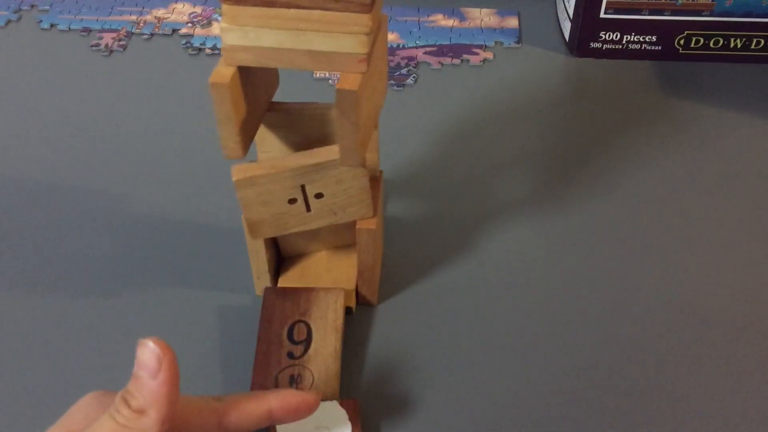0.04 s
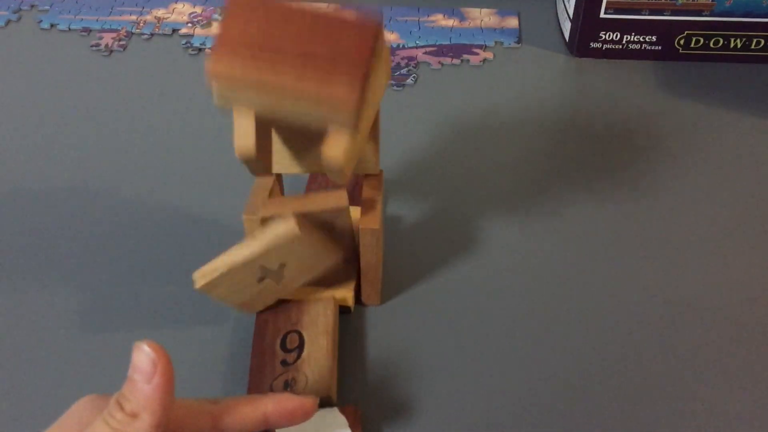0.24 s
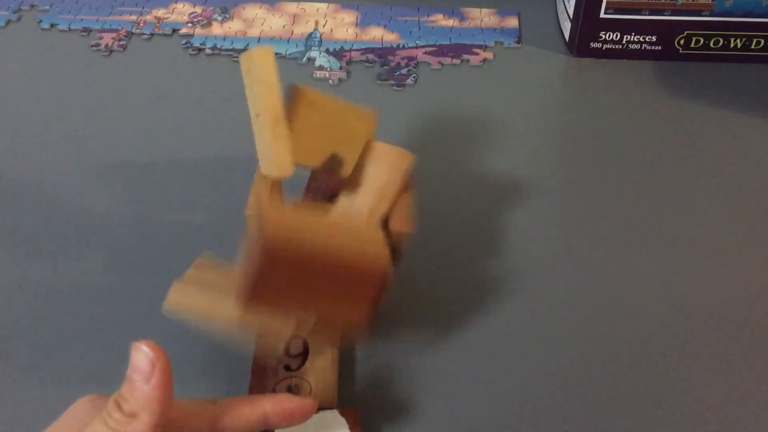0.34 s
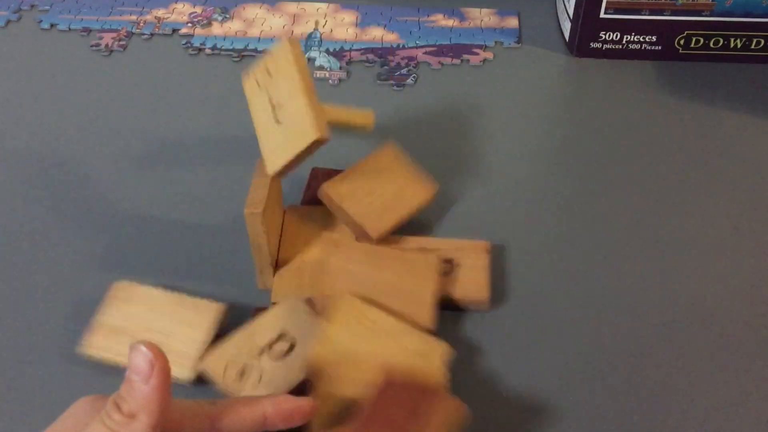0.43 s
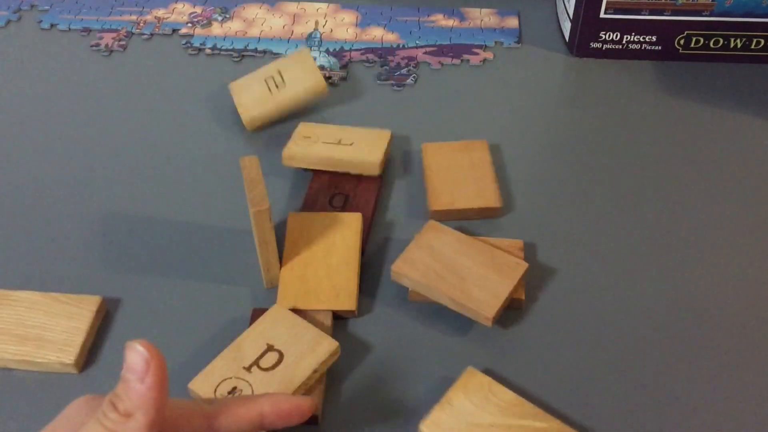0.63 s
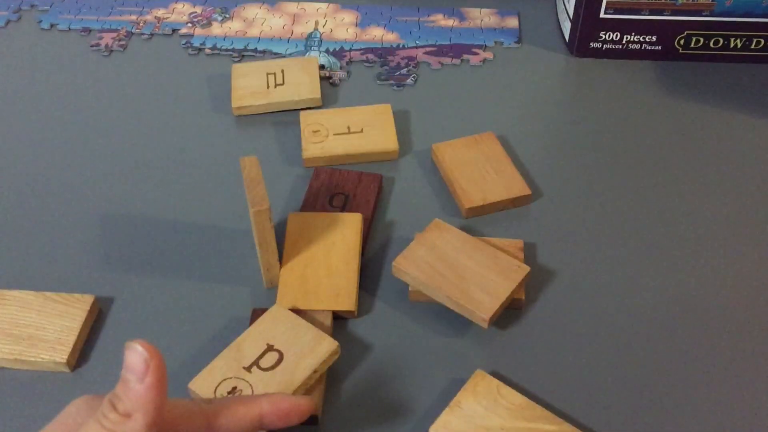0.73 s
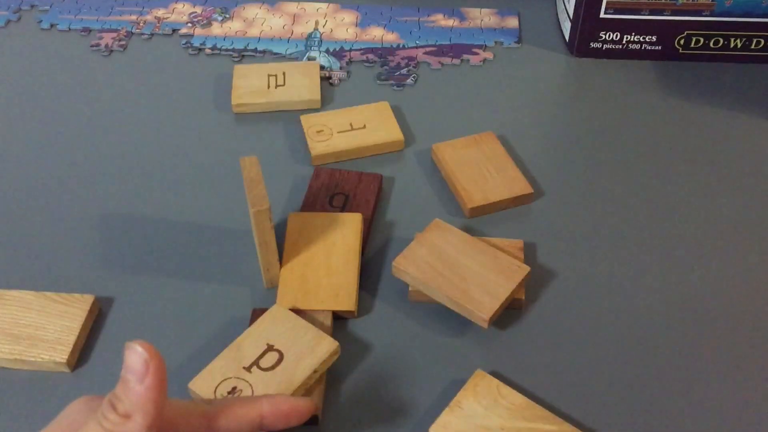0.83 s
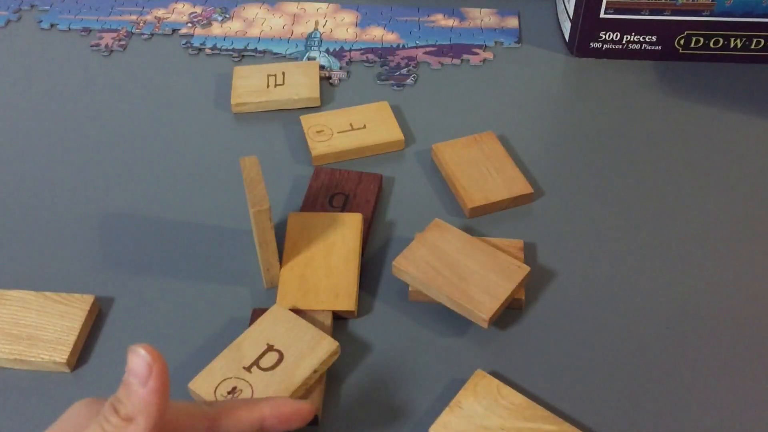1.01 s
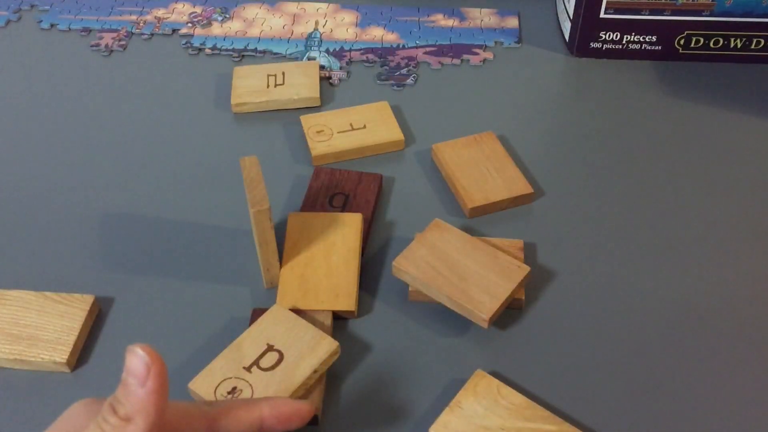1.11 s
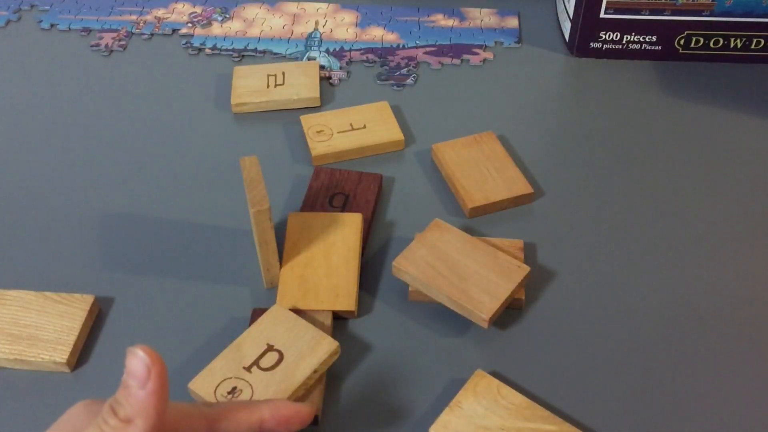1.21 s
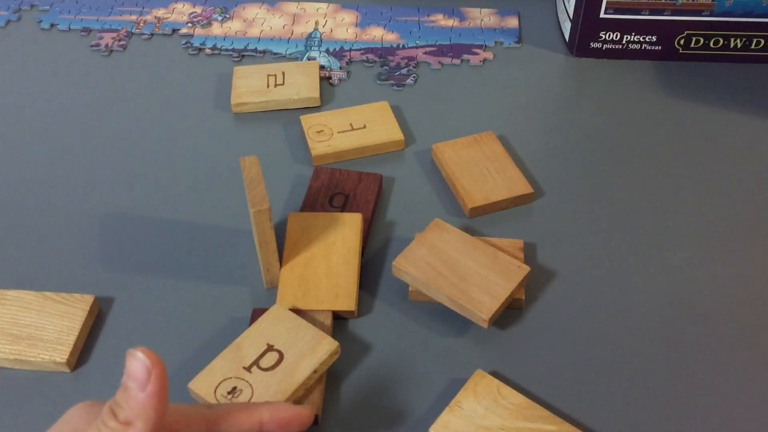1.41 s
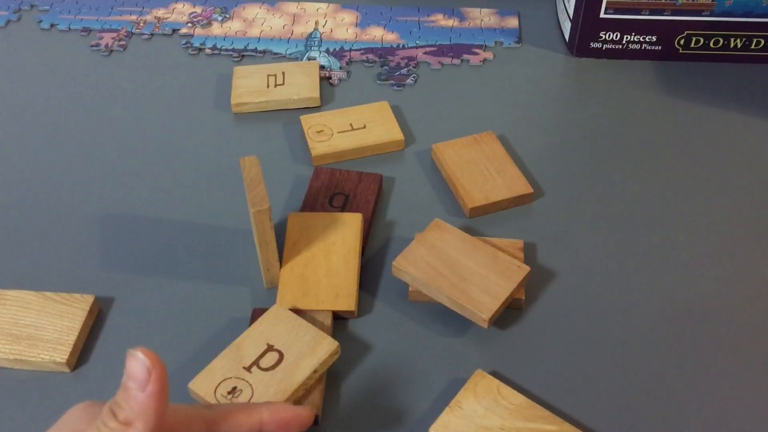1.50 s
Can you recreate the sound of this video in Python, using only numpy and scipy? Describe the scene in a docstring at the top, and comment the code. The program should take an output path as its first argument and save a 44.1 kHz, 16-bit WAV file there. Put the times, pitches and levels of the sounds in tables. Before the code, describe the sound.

A tower of wooden dominoes collapses on a table, close up in a small room. A tile scrapes faintly just before the first sharp knock at 0.2 seconds. Clacks, thuds and bounces build into a dense clatter, loudest and slightly overloaded from 0.4 to 0.7 seconds. The last light taps end around 1 second, and a faint, thin ring fades over low rumble and hiss.

```python
"""A tower of wooden dominoes collapses on a table in a small room, close up, overloading the input.
Each knock is a contact crack, the tile's modes and a table thud; small bounces fill the gaps.
A tile scrapes before the fall. A thin ring, as of glass or metal, swells with the clatter and dies.
Behind it: low rumble, hiss, faint hum and a fading echo at the start."""
import sys
import numpy as np
from scipy import signal
from scipy.fft import rfft, irfft
from scipy.io import wavfile
from scipy.ndimage import uniform_filter1d

SR = 44100
rng = np.random.default_rng(int(sys.argv[2]) if len(sys.argv) > 2 else 0)


def master_out(mix):
    """Clip the mix to full scale and print it as 16-bit PCM to the path in sys.argv[1]."""
    frames = np.transpose(np.atleast_2d(mix))
    ceiling = np.clip(frames, -1, 1)
    pcm = np.round(ceiling * 32767).astype(np.int16)
    wavfile.write(sys.argv[1], SR, pcm)


N = 68355
PIVOT_HZ = 3000  # spectral tilt is 0 dB here


def dominoes(spot_count, bounces_per_s=260):
    """Loud knocks and small random bounces, dealt out over spots on the table."""
    # tile impacts: (time [s], level [dB], pitch [ratio], tilt [dB/oct], favoured [Hz], thud [dB])
    knocks = [(0.2104, -1, 1.045, -2.35, 2860, -3.5), (0.2351, -15, 1, -7, 2784, -14),
              (0.2422, -12, 1.2, -1, 2627, -8.5), (0.2494, -14, 1, -2, 2722, -13),
              (.259, -15, 1, 4, 2762, -6.5), (.267, -14, 0.94, -2, 2750, -16),
              (0.2855, -1, 1.027, -1, 5300, -5), (0.3116, -18, 1, -9.5, 2660, -18.5),
              (0.3273, 1, 1, 4, 1758, -5), (0.3477, 0, 0.92, 3, 1160, -5),
              (0.36, -0.5, 0.86, -3, 2280, 4.5), (0.3894, -1, 1.23, 1, 1886, -6),
              (.398, -0.5, 0.92, 2.5, 2020, 3), (0.4165, 5.5, 1.1, 10, 4800, 5.5),
              (.424, 6, .95, -2, 2200, -6), (0.4404, 9, 1.02, 2.5, 5600, -1.5),
              (0.4565, -3, 1.1, -0.5, 2400, 8), (.4755, -7.5, 1.3, 6.5, 1800, -6.5),
              (0.4924, 4, .97, -1.5, 2250, -8.5), (0.51, 1, 1.18, 4.5, 1400, 7),
              (0.527, -7.5, .94, -6.5, 1800, -2.5), (0.5497, -7, 1.05, 4.5, 3374, -4.5),
              (0.5586, 7, .93, 2.5, 4900, -5.5), (0.572, 3.5, .98, 0.5, 1760, 3),
              (0.585, -5, 1.09, 0.5, 3000, 0), (.606, -11.5, 1.3, 4, 5360, -5),
              (0.6297, -13, 1.05, 9.5, 1970, -4), (.641, 5.5, 0.98, 3, 4100, -11),
              (.653, -4.5, 1.08, 4, 7900, 2), (.661, 1, 1.24, -2.5, 4210, 3),
              (0.681, -5, 1.14, 4.5, 2956, 5.5), (0.7143, -7, 0.82, 3.5, 2500, -10),
              (0.734, -10, 1.02, 8.5, 5600, -15), (0.742, -6.5, 1.01, 4, 5400, -3),
              (0.749, -4.5, 1.3, 1, 4000, 2), (.759, -10, .96, -2.5, 5100, -8),
              (0.7672, -16.5, 1.03, 10, 3500, 11), (0.777, -2.5, .98, -1, 2300, -23),
              (0.784, -8, 1.09, 7, 4760, -7), (0.796, -21, 0.79, 4, 3000, 15),
              (.82, -11.5, 1.01, 6.5, 6140, 3.5), (0.8353, -20.5, 1, -4, 2840, -16),
              (.8432, -13.5, .98, 4, 1730, -4), (.855, -15.5, 1.01, 1, 2270, 6),
              (0.8705, -17.5, 1, 6, 1760, -2), (0.8799, -19.5, 1, -13, 2700, 4),
              (0.8967, -16.5, 1, 6, 1830, 0.5), (0.912, -23.5, 1, 0.5, 1600, -17),
              (0.9268, -27, 1, -1, 1310, -15), (0.9787, -30.5, 0.93, 4, 3200, -18),
              (.9868, -30.5, 1, -3, 1400, -16), (1.061, -50, .9, -17, 1200, 3)]
    # bounce envelope: (time [s], level [dB])
    bounce_levels = [(0.221, -17.5), (0.269, -37), (0.302, -37), (0.339, -21), (0.386, -18), (.43, -6.5),
                     (.59, -5.5), (.70, -15), (.78, -18.5), (0.879, -23), (.925, -35), (.96, -63)]
    spots = np.zeros((spot_count, N))
    for k, (time_s, *blow) in enumerate(knocks):
        add(spots[k % spot_count], time_s, knock(*blow))
    times_s, levels_db = np.transpose(bounce_levels)
    for k, (late, force, detune, octaves) in enumerate(rng.standard_normal((300, 4))):
        time_s = times_s[0] + (k + .5 * late) / bounces_per_s
        if time_s < times_s[-1]:
            level_db = np.interp(time_s, times_s, levels_db) + 1.9 * force
            bounce = knock(level_db, pitch=1 + .06 * detune, tilt_db_oct=.5,
                           favoured_hz=PIVOT_HZ * 2 ** octaves, thud_db=-3)
            add(spots[k % spot_count], time_s, bounce)
    return spots


def knock(level_db, pitch, tilt_db_oct, favoured_hz, thud_db):
    """One blow, tile on tile or table: wood, crack and thud."""
    t = np.arange(SR // 8) / SR
    wood = tile_modes(t, pitch, tilt_db_oct, favoured_hz)
    crack = contact_crack(t, level_db, tilt_db_oct)
    return amp(level_db) * (wood + crack + table_thud(t, thud_db))


def tile_modes(t, pitch, tilt_db_oct, favoured_hz):
    """A tile rings: its size shifts the modes, the strike point decides which stand out."""
    # tile modes: (frequency [Hz], relative level [dB], t60 [s])
    modes = [(1104, -8, 0.041), (1400, -10, 0.0524), (1600, -11, 0.079), (1864.5, -1.5, 0.023),
             (2311, 1, 0.016), (2639, -3.5, 0.039), (3174, -4, 0.042), (3444, -3.5, .045), (3811, 2, 0.013),
             (4202, -0.5, 0.023), (4916, 2, 0.013), (5400, -5.5, 0.034), (5770, -11, .04),
             (7030, -13, 0.039), (8370, -16, 0.04), (9950, -27, 0.084), (11860, -29, .04),
             (13800, -27.5, 0.028)]
    hz, db, t60_s = np.transpose(modes)
    size, point = rng.standard_normal((2, len(hz)))
    favour_db = 10.5 * np.exp(-(np.log2(hz / favoured_hz) / .37) ** 2)
    gain = amp(db + favour_db + 1.5 * point + tilt_db_oct * np.log2(hz / PIVOT_HZ))
    return ring(hz * pitch * (1 + .014 * size), 2 * gain / np.linalg.norm(gain), t60_s, t)


def contact_crack(t, level_db, tilt_db_oct, contact_s=.00021):
    """Noise burst that swells while the surfaces press together; soft blows are duller."""
    # crack spectrum: (frequency [Hz], relative density [dB])
    spectrum = [(60, -25), (220, -11.5), (480, -6.5), (1000, -3), (1800, 2.5), (3000, 3.5), (5800, -8),
                (7000, -12.5), (11000, -20.5), (16000, -32)]
    hz, db = np.transpose(spectrum)
    dull_db = .1 * min(level_db, 0) * np.maximum(np.log2(hz / 3400), 0)
    tilt_db = tilt_db_oct * np.clip(np.log2(hz / PIVOT_HZ), -1, 1)
    burst = noise(np.transpose([hz, db + dull_db + tilt_db]), len(t))
    return amp(-1.5) * burst * np.minimum(t / contact_s, 1) * decay(t, t60_s=.028)


def table_thud(t, thud_db, pitch_spread=.025):
    """The table top rings low; its pitch varies with where it is hit."""
    # table-top modes: (frequency [Hz], relative level [dB], t60 [s])
    modes = [(68, -39, .2), (102.5, -31, 0.2), (122, -35, 0.04), (224, -30.5, 0.049), (280.7, -30, 0.044),
             (355, -30, 0.12), (426, -25, .15), (547.6, -30, 0.022), (677, -21.5, .05)]
    hz, db, t60_s = np.transpose(modes)
    return ring(hz * (1 + pitch_spread * rng.standard_normal(len(hz))), amp(db + thud_db), t60_s, t)


def scrape():
    """Friction noise of a pushed tile sliding over its neighbour."""
    # slide envelope: (time [s], level [dB])
    levels = [(0.112, -70), (0.144, -42.5), (.17, -37.5), (0.191, -41.5), (0.211, -52.5)]
    # friction spectrum: (frequency [Hz], relative density [dB])
    spectrum = [(60, -10.5), (300, 7.5), (700, -4), (1500, 5.5), (2500, -20.5), (4500, -19.5),
                (8000, -29.5), (16000, -42.5)]
    level_db = np.interp(np.arange(N) / SR, *np.transpose(levels), left=-120, right=-120)
    return noise(spectrum, N) * amp(level_db)


def thin_ring(hz=2319, beat_hz=10, decay_db_per_s=30):
    """Two close modes beat as they die, set going at the start and again during the clatter."""
    # excitations: (time [s], level [dB], rise [s])
    excitations = [(0, -43.5, 0.0007), (.45, -28.5, .2)]
    t, envelope = np.arange(N) / SR, np.zeros(N)
    for time_s, db, rise_s in excitations:
        add(envelope, time_s, np.minimum(t / rise_s, 1) * amp(db - decay_db_per_s * t))
    twin = amp(-13) * np.sin(2 * np.pi * ((hz + beat_hz) * t + rng.random()))
    return envelope * (np.sin(2 * np.pi * hz * t) + twin)


def room(early_db=-12.5, tail_db=-15.5):
    """Impulse response: direct sound, quick reflections off table and tiles, short tail."""
    # room decay: (frequency [Hz], t60 [s])
    decay_times = [(100, .45), (600, .42), (1700, .45), (3000, .36), (4600, .3), (8000, .3), (16000, .22)]
    t = np.arange(SR * 3 // 4) / SR
    early = rng.standard_normal(len(t)) * (rng.random(len(t)) < .05) * decay(t, t60_s=.055)
    early = signal.lfilter(*signal.butter(1, 7000, fs=SR), early)
    early *= amp(early_db) / np.linalg.norm(early)
    hz, age_s, bins = signal.stft(rng.standard_normal(len(t)), SR, nperseg=256)
    tail = signal.istft(bins * decay(age_s, at_hz(decay_times, hz)[:, None]), SR)[1][:len(t)]
    tail = signal.lfilter(*signal.butter(1, 6000, fs=SR), tail * np.minimum(t / .0027, 1))
    tail *= amp(tail_db) / np.linalg.norm(tail)
    return (t == 0) + early + tail


def background(floor_db=-40.5, echo_db=-50, echo_decay_db_per_s=99):
    """Low rumble and hiss, faint hum, and a room echo fading at the start."""
    # noise floor: (frequency [Hz], relative density [dB])
    floor_spectrum = [(10, 3.5), (45, 0), (70, -7), (110, -10), (160, -23), (350, -26), (500, -35.5),
                      (1200, -38.5), (3000, -41), (8000, -48.5), (16000, -50.5)]
    # hum lines: (frequency [Hz], rms level [dB])
    hum_lines = [(50, -52), (701, -72.5), (1981, -76)]
    # room echo: (frequency [Hz], relative density [dB])
    echo_spectrum = [(100, -6), (330, 6.5), (600, -14), (1400, -6), (2800, -6.5), (5000, -17), (9000, -40)]
    t = np.arange(N) / SR
    hum = sum(amp(db) * np.sqrt(2) * np.sin(2 * np.pi * (hz * t + rng.random())) for hz, db in hum_lines)
    floor = amp(floor_db) * noise(floor_spectrum, N)
    echo = amp(echo_db - echo_decay_db_per_s * t) * noise(echo_spectrum, N)
    return floor + hum + echo


def amp(db):
    """Decibels to gain."""
    return 10 ** (np.asarray(db) / 20)


def decay(t, t60_s):
    """Envelope falling 60 dB in t60_s."""
    return np.exp(-np.log(1000) * t / t60_s)


def at_hz(points, hz):
    """Interpolate on a log-frequency axis."""
    points_hz, values = np.transpose(points)
    return np.interp(np.log(hz + 1), np.log(points_hz), values)


def add(mix, time_s, sound):
    """Mix a sound in at time_s."""
    part = mix[max(round(time_s * SR), 0):][:len(sound)]
    part += sound[:len(part)]


def noise(spectrum, size):
    """Unit-rms noise with the given spectrum."""
    gain = amp(at_hz(spectrum, np.fft.rfftfreq(size, 1 / SR)))
    x = irfft(rfft(rng.standard_normal(size)) * gain, size)
    return x / x.std()


def ring(hz, gain, t60_s, t):
    """Damped modes of random polarity."""
    sign = rng.choice([-1, 1], len(hz))
    return (sign * gain) @ (np.sin(2 * np.pi * hz[:, None] * t) * decay(t, t60_s[:, None]))


def scene():
    """The collapse, each spot with its own reflections, over the quiet sounds; mono."""
    quiet = background() + scrape() + thin_ring()
    clatter = sum(signal.fftconvolve(spot, room())[:N] for spot in dominoes(spot_count=5))
    return (clatter + quiet)[None]


def record(dry):
    """Input overload with a hard knee, then a low-pass."""
    ceiling, knee, cutoff_hz = .45, 7, 15850
    clipped = dry / (9 + abs(dry / ceiling) ** knee) ** (1 / knee)
    lowpass = signal.firwin(511, cutoff_hz, window=("kaiser", 9), fs=SR)
    return signal.oaconvolve(clipped, lowpass[None], "same")


dry = scene()
out = record(dry)
master_out(out)
```